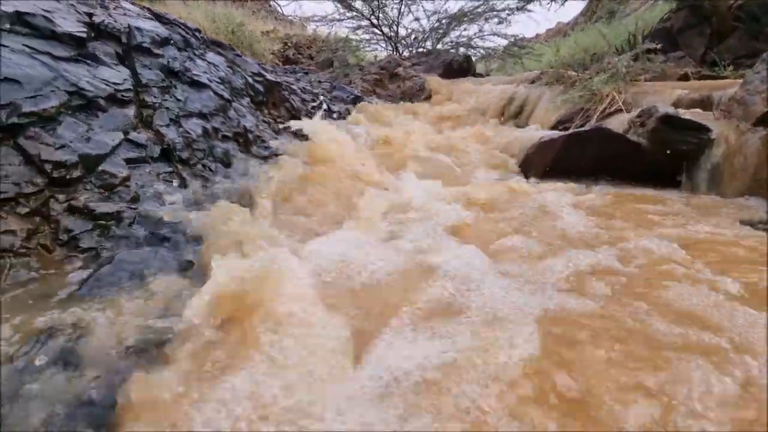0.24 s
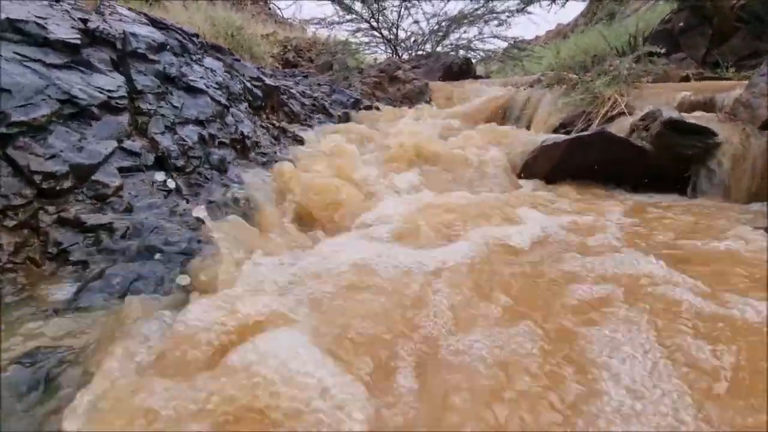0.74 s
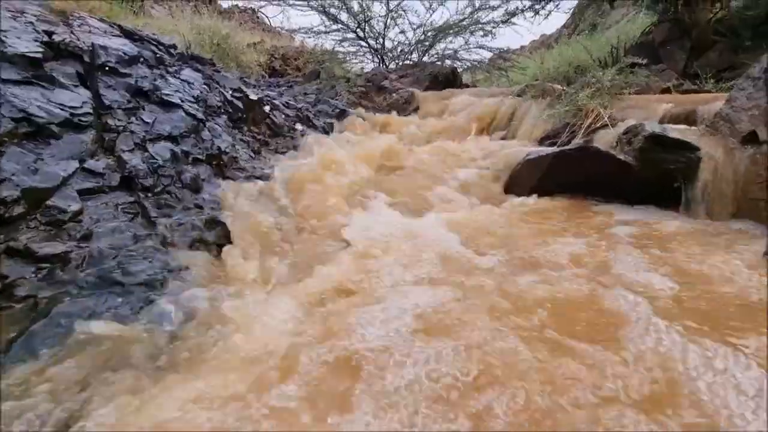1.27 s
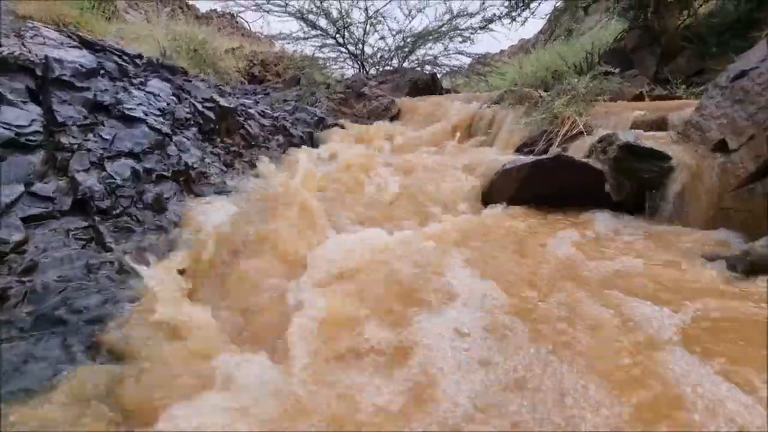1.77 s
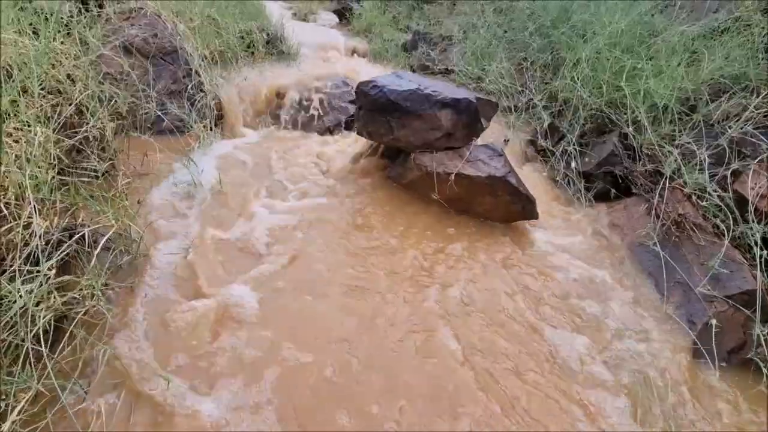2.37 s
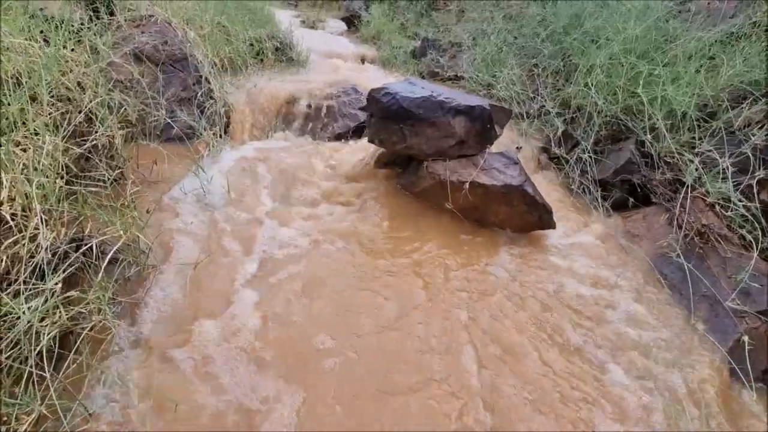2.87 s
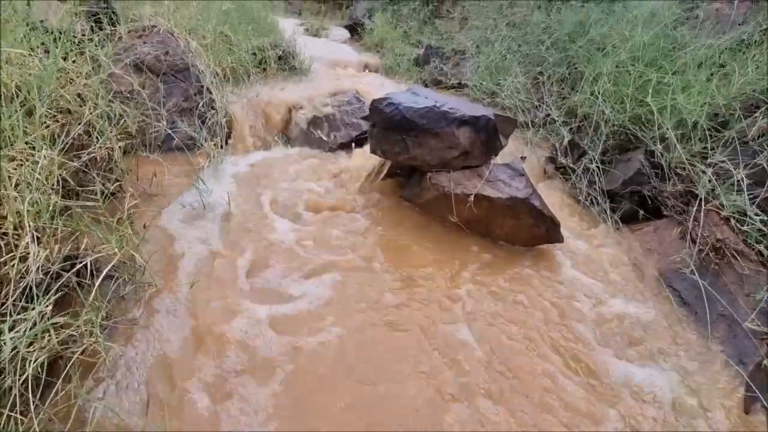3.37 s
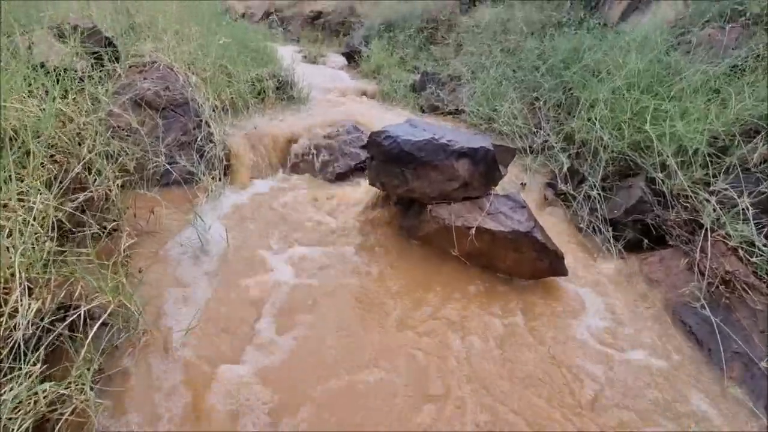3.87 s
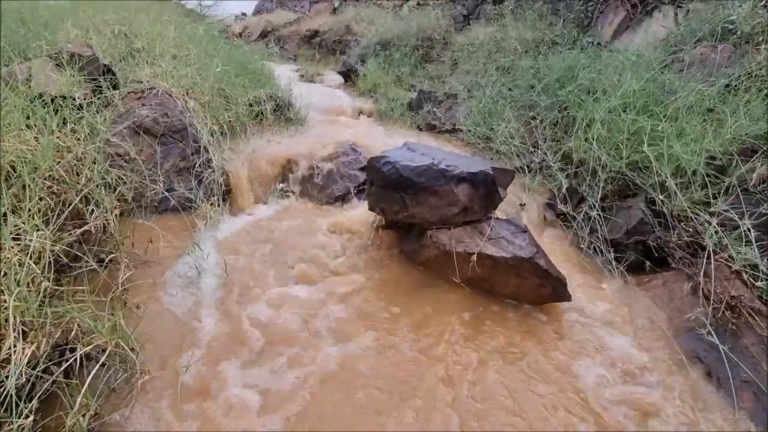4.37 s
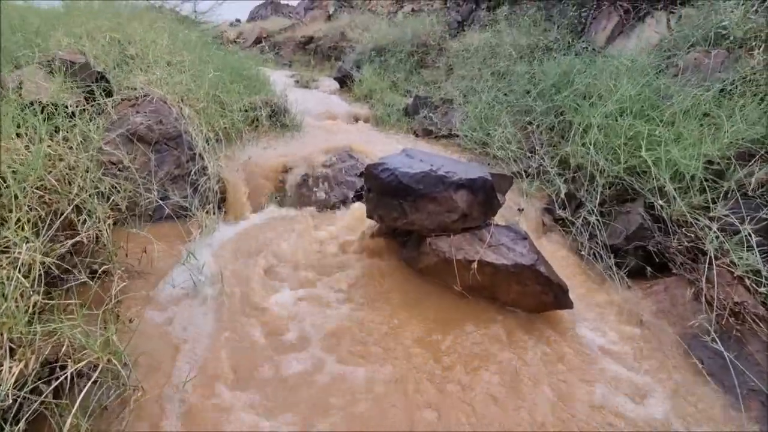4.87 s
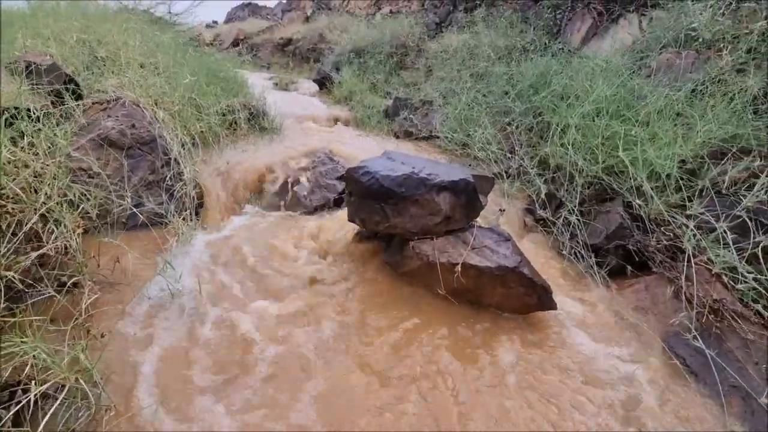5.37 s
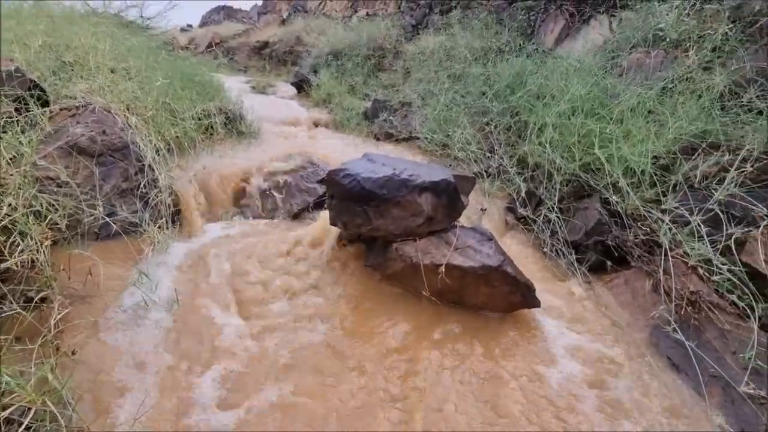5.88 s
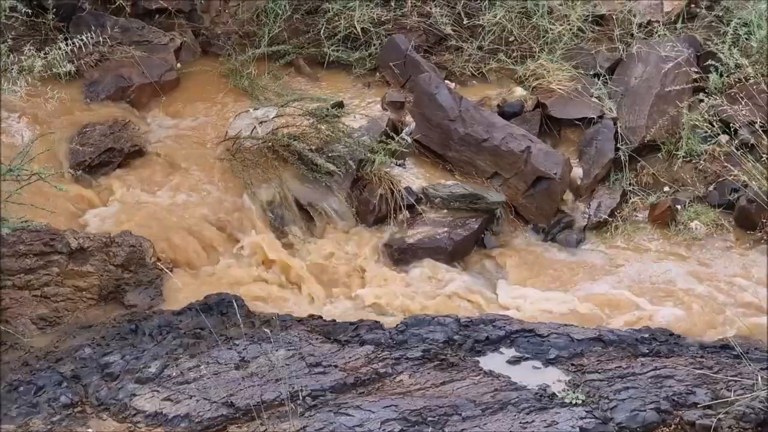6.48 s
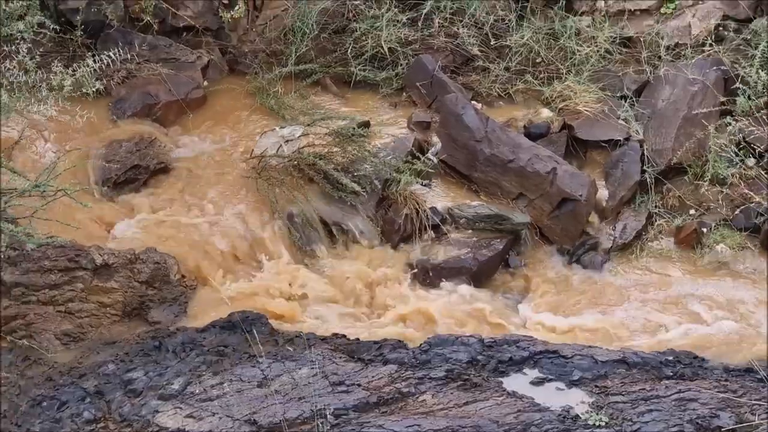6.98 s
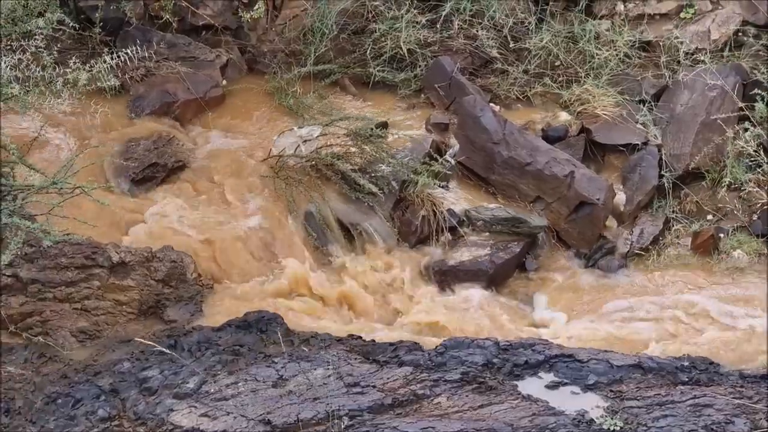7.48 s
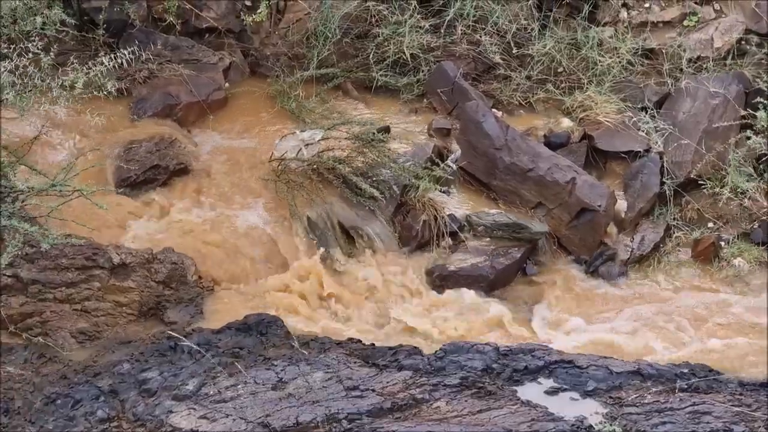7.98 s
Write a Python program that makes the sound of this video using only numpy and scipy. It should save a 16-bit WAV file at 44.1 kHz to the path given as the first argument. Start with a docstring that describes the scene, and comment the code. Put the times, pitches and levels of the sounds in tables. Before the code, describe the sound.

Outdoors, close to a muddy flood stream: churning water rushes down rocky rapids with bubbling gulps and sharp slaps. After a tiny, nearly silent cut, a pool roars on with deeper gulps, drips and splashes. Another cut leads to the bank, where wind rumbles and thumps on both microphones. The left side is muffled and hollow, the right bright and hissy.

```python
"""First muddy flood water pours down rocky rapids; a short, near-silent cut leads to a pool.
A second cut leads to the bank, where wind buffets both microphones; near the end the left one rings higher.
All along, the roar is noisy foam and clouds of ringing bubbles, with spray in random bursts.
Single gulps, drips and splashes stand out; the left microphone is muffled, the right one bright."""
import sys
import numpy as np
from scipy import signal
from scipy.fft import rfft, irfft, next_fast_len
from scipy.io import wavfile
from scipy.ndimage import uniform_filter1d, map_coordinates

SR = 44100
rng = np.random.default_rng(int(sys.argv[2]) if len(sys.argv) > 2 else 0)


def unload_audio(sound):
    """Save the sound as a 16-bit wav file, at the path given as the first command line argument."""
    columns = np.transpose(np.atleast_2d(sound))
    # keep every value between -1 and 1, then stretch to whole-number steps
    steps = np.round(np.clip(columns, -1, 1) * 32767)
    wavfile.write(sys.argv[1], SR, steps.astype(np.int16))


N = 362931  # length in samples


def amp(db):
    """Turn decibels into a gain."""
    return 10 ** (np.asarray(db) / 20)


def unit(x):
    """Scale a sound to an average (rms) strength of 1."""
    return x / np.sqrt(np.mean(x ** 2) + 1e-20)


def along(points, hz, axis=1):
    """Read one column of a table whose first column is f/Hz, on a log pitch axis."""
    columns = np.transpose(points)
    return np.interp(np.log(hz + 1), np.log(columns[0] + 1), columns[axis])


def wobble(rate):
    """Draw a smooth random curve with rate new random values a second."""
    knots = rng.standard_normal(int(N * rate / SR) + 4)
    return map_coordinates(knots, [np.arange(N) * rate / SR])


def filtered(x, response):
    """Multiply the spectrum of x by a response, which may also shift phases."""
    m = next_fast_len(N + SR // 4)
    return irfft(rfft(x, m) * response(np.fft.rfftfreq(m, 1 / SR)), m)[..., :N]


def add(track, s, sound):
    """Mix a sound into the track from time s."""
    part = track[max(0, round(s * SR)):][:len(sound)]
    part += sound[:len(part)]


def water():
    """Make two views of the flow, in front and aside, that share their ups and downs but not their noise."""
    roar_db, spray_db, _ = steady()
    swell_db = waves()
    # slow random sway, 7 values a second; spray takes 0.71 dB for each dB of a wave
    roar_db = roar_db + swell_db + 0.74 * wobble(7)
    spray_db = spray_db + 0.71 * swell_db + 0.35 * wobble(7)
    heave = unit(.75 * wobble(14) + wobble(58))
    bursts = unit(wobble(15) + .9 * wobble(50) + .7 * wobble(170))
    views = []
    for _ in range(2):
        roar, spray = torrent(heave, bursts)
        views.append(amp(roar_db) * roar + amp(spray_db) * spray)
    front, aside = views
    return front + gulps() + drips() + splashes(), aside


def torrent(heave, bursts):
    """Build the low roar from foam and gurgling bubbles, the high spray from foam, fizz and droplets."""
    foam = patchy_noise(patchy_db=1.4)
    deep_foam = filtered(foam, lambda hz: 1 / (1 + (hz / 1700) ** 4))
    bright_foam = foam - deep_foam
    gurgle = cloud(amp(2.2 * heave), 149.5, 1710.6, cycles=25.0, onset=0.045, spread_db=2.5, count=5000)
    fizz = cloud(amp(3 * bursts), 1602, 5960, cycles=29.5, onset=0.016, spread_db=3.0, count=12000)
    droplets = cloud(amp(5 * bursts), 5650, 16100, cycles=19, onset=.25, spread_db=3.5, count=18000)
    roar = amp(-4.0 + 0.97 * heave) * deep_foam + amp(-3.5) * gurgle
    spray = amp(-3.0 + 0.56 * bursts) * bright_foam + amp(-4.0) * fizz + amp(-5.0) * droplets
    return roar, spray


def patchy_noise(patchy_db):
    """Make churning foam: white noise with random patches of gain in time and pitch."""
    z = signal.stft(rng.standard_normal(N), nperseg=512)[2]
    field = uniform_filter1d(rng.standard_normal(z.shape), size=6, axis=0)  # smooth across pitch
    field = uniform_filter1d(field, size=8, axis=1)  # smooth across time
    noise = signal.istft(z * amp(patchy_db * unit(field)), nperseg=512)[1]
    return unit(noise[:N])


def cloud(activity, low_hz, high_hz, cycles, onset, spread_db, count):
    """Ring many bubbles, born more densely where activity is high, as strong per Hz as white noise of rms 1."""
    when, pitch, luck, ring = rng.random((count, 4)).T
    start = np.searchsorted(np.cumsum(activity) / activity.sum(), when)
    hz = low_hz * (high_hz / low_hz) ** pitch
    turns = cycles * 2 ** (2 * ring - 1)  # half to double the usual number of cycles
    life = turns / hz * SR  # in samples
    loudness_db = -spread_db * np.log(np.maximum(luck, .012))  # a few bubbles are much louder
    strength = hz / np.sqrt(turns) * amp(loudness_db) * rng.choice([-1, 1], count)
    # lay all bubbles end to end: who rings, and how many samples since its birth
    length = life.astype(int) + 1
    who = np.repeat(np.arange(count), length)
    step = np.arange(len(who)) - np.repeat(np.cumsum(length) - length, length)
    rings = strength[who] * bubble(step / life[who], turns[who], rise=0.074, onset=onset)
    mixed = np.bincount(start[who] + step, rings, N)[:N]
    return unit(mixed) * np.sqrt(abs(high_hz - low_hz) / (SR / 2))


def bubble(age, cycles, rise, onset):
    """Ring a fading bubble that rises in pitch as it nears the surface; age runs 0-1."""
    fade = (1 - np.exp(-age / onset)) * np.exp(-np.log(100) * age)
    return fade * np.sin(2 * np.pi * cycles * (age + rise * age ** 2 / 2))


# the three places, rapids, pool and bank: start t/s, end t/s
PLACE_TIMES = [(-.01, 2.089), (2.147, 6.327), (6.387, 8.24)]
# relative levels at each place: roar level/dB, spray level/dB, wind level/dB
STEADY_LEVELS = [(1.06, -0.04, -53), (-0.92, 0.08, -50.5), (0.23, 0.26, -30.5)]


def steady():
    """Look up the roar, spray and wind levels of the place heard at each moment."""
    ends = [end for start, end in PLACE_TIMES[:-1]]
    # switch 0.05 s late, inside the cut
    place = np.searchsorted(ends, np.arange(N) / SR - .05)
    return np.array(STEADY_LEVELS)[place].T


# waves that swell the flow: start t/s, time to the crest t/s, rise at the crest level/dB
WAVE_SWELLS = [(2.2, 0.094, 1.3), (4.1, .14, 2), (4.45, 0.26, 1), (5.15, .12, 1.3), (5.7, 0.34, 1.1),
               (8.08, .1, 2)]


def waves():
    """Swell the flow in dB: each wave rises quickly to its crest and drains more slowly."""
    swell_db = np.zeros(N)
    for s, crest_s, db in WAVE_SWELLS:
        age = np.maximum(np.arange(N) / SR - s, 0) / crest_s
        swell_db += db * age * np.exp(1 - age)
    return swell_db


# large air pockets that collapse: start t/s, starting pitch f/Hz, relative level/dB
GULP_EVENTS = [(.26, 1160, 11.5), (.333, 830, 6), (.512, 400, 9.5), (.535, 1030, 6), (.635, 896, 8.5),
               (.915, 1010, 7), (.925, 1357, 11), (.981, 1090, 4.5), (1.204, 720, 10), (1.35, 1080, 6),
               (1.382, 1030, 9), (1.611, 1130, 8), (2.269, 550, 12.5), (3.066, 706, 7), (3.668, 556, 6),
               (4.193, 1040, 7), (4.21, 634, 12), (4.234, 1470, 7), (4.385, 345, 4), (4.461, 425, 8),
               (4.787, 1130, 4), (4.964, 770, 9), (5.245, 360, 9.5), (5.882, 1095, 7.5), (5.943, 604, 9)]


def gulps():
    """Ring deep gulps as big single bubbles that rise in pitch."""
    return amp(-2.0) * plops(GULP_EVENTS, cycles_at_khz=17.8, rise=0.076, onset=0.11)


# water slapping on rock close by: t/s, brightest f/Hz, relative level/dB
SPLASH_EVENTS = [(0.108, 10500, 2), (0.239, 7140, 6.5), (0.433, 12200, 10), (0.616, 9600, 4),
                 (0.792, 8300, 3), (1.13, 10700, 5), (1.326, 14000, 7), (1.566, 12700, 4.7),
                 (2.58, 14100, 3), (2.82, 13100, 6), (2.969, 10900, 2), (4.218, 11200, 10),
                 (4.313, 4000, 3), (4.387, 11500, 9), (4.641, 12700, 9.5), (4.799, 12200, 8),
                 (5.398, 5700, 3.5), (5.889, 8800, 4), (5.981, 14600, 6), (6.214, 5230, 5),
                 (7.319, 8300, 5.5), (7.527, 7355, 5)]


def splashes():
    """Shape each slap from hiss: a short crack inside a puff of spray that swells and falls back."""
    out, t = np.zeros(N), np.arange(SR // 16) / SR
    hz = np.fft.rfftfreq(len(t), 1 / SR) + 1
    lead = .008  # s of puff before the listed time
    crack = np.exp(-np.abs(t - lead - .001) / 0.00094)
    puff = (t / 0.013) ** 2 * np.exp(2 - 2 * t / 0.012)
    for s, bright_hz, db in SPLASH_EVENTS:
        octaves_off = np.log2(hz / bright_hz)
        hiss = irfft(rfft(rng.standard_normal(len(t))) / (1 + (octaves_off / 0.87) ** 2), len(t))
        add(out, s - lead, unit(hiss) * (amp(db - 0.5) * crack + amp(db - 7) * puff))
    return out


# single drops that plink into the water: start t/s, starting pitch f/Hz, relative level/dB
DRIP_EVENTS = [(.611, 3040, 2), (.79, 8040, 3), (2.548, 6830, 3), (2.807, 3260, 2), (3.995, 2500, 3),
               (4.785, 5100, 5), (4.926, 6120, 5), (4.944, 1720, 2), (5.885, 4090, 5), (6.214, 5300, 2)]


def drips():
    """Ring each drop as one small bubble with many cycles."""
    return amp(-2.5) * plops(DRIP_EVENTS, cycles_at_khz=45, rise=0.037, onset=.08)


def plops(table, cycles_at_khz, rise, onset):
    """Ring single bubbles that stand out of the flow; higher ones ring for more cycles and get a boost."""
    out = np.zeros(N)
    for s, hz, db in table:
        pitch_gain = np.sqrt(hz / 1000)
        cycles = cycles_at_khz * pitch_gain
        age = np.arange(0, 1, hz / (cycles * SR))
        add(out, s, amp(db) * pitch_gain * bubble(age, cycles, rise, onset))
    return out


# colour of the water at each place and microphone: f/Hz, relative level/dB per Hz
RAPIDS_LEFT_COLOUR = [(50, -66), (160.0, -66), (254.0, -67.5), (346.0, -59.5), (471.0, -53), (641.0, -55.5),
                      (1020.0, -42), (1790.0, -68.5), (8810.0, -103.4), (14000.0, -103.6),
                      (15500.0, -112.3)]
RAPIDS_RIGHT_COLOUR = [(50, -63.5), (130, -69), (185, -61), (270, -67), (403, -55), (641, -59), (900, -55),
                       (1020, -50), (1320, -58.5), (3490, -68), (4520, -66), (5550, -74), (9760, -78),
                       (14000, -72), (15500, -78)]
POOL_LEFT_COLOUR = [(50, -64), (160.0, -71.5), (329.0, -62.5), (522.0, -53.5), (710.0, -59), (1070.0, -46),
                    (1890.0, -75), (3870.0, -82), (10800.0, -107.3), (12600.0, -96.5), (15500.0, -111.9)]
POOL_RIGHT_COLOUR = [(50, -65), (200, -69), (290, -62), (385, -52.5), (460, -58.5), (900, -57),
                     (1080, -52.8), (1500, -62.5), (2150, -67), (4070, -62.5), (5200, -73.5), (6750, -72),
                     (10700, -81), (12400, -67.5), (15500, -76.5)]
BANK_LEFT_COLOUR = [(50, -62), (330, -63.5), (460, -72.5), (580, -63.5), (800, -63.5), (1000, -53.5),
                    (1170, -57.5), (1380, -51), (1520, -63.5), (1700, -65.5), (1960, -74), (3620, -96),
                    (4140, -110), (5000, -114.5)]
BANK_RIGHT_COLOUR = [(50, -76), (330, -65), (460, -70.5), (590, -62), (720, -65.5), (975, -61),
                     (1990, -70.5), (3190, -68), (3740, -63), (6250, -77), (8910, -73.5), (11000, -80.5),
                     (12200, -71), (15500, -78.5)]
# how the microphones agree, facing upstream and across: f/Hz, likeness [0-1], left lead [radians]
UPSTREAM_AGREEMENT = [(49.6, 0.86, 1), (176, 1, 0), (443, 0.79, 0.68), (623, 0.13, -0.3),
                      (840, 0.58, -1.68), (1018, 0.92, -2), (1220, 0.68, -2), (1490, 0.2, -3),
                      (1850, 0.19, -3.5), (2900, 0.43, -3.5), (4000, .8, -5), (5500, .65, -4),
                      (14500, 0.7, -5.5)]
ACROSS_AGREEMENT = [(300, 1, -1.45), (600, 0.94, 0.5), (1080, 0.8, 0), (1370, 0.58, -1.3), (1610, 0.37, -3),
                    (2110, 0.37, -2), (3050, .43, -3.5), (3900, .48, -1), (4700, .22, -2.1), (7000, .03, 0)]


def listen(front, aside, left, right, agreement):
    """Give the right microphone the water in front, the left a phase-shifted share of it plus water aside."""
    def colour(points, hz):
        low_cut = hz / np.hypot(hz, 35)
        return amp(along(points, hz)) * np.sqrt(SR / 2) * low_cut  # the root turns level per Hz into gain

    def alike(hz):
        return np.clip(along(agreement, hz), 0, 1)

    def turn(hz):
        return np.exp(1j * along(agreement, hz, axis=2))

    shared = filtered(front, lambda hz: colour(left, hz) * alike(hz) * turn(hz))
    own = filtered(aside, lambda hz: colour(left, hz) * np.sqrt(1 - alike(hz) ** 2))
    return np.array([shared + own, filtered(front, lambda hz: colour(right, hz))])


# the grip shifts and the hollow at the left microphone rings higher: t/s, pitch factor [ratio]
HOLLOW_TUNING = [(8.03, 1.025), (8.15, 1.02), (8.22, 1.15)]


def retuned(sound, spectrum):
    """Slide the hollow's resonances by cross-fading between three tunings of the colour."""
    seconds, factors = np.transpose(HOLLOW_TUNING)
    factor = np.interp(np.arange(N) / SR, seconds, factors)
    steps = np.linspace(factor.min(), factor.max(), 3)
    out = np.zeros(N)
    for step, share in zip(steps, np.eye(len(steps))):
        shifted = filtered(sound, lambda hz: amp(along(spectrum, hz / step) - along(spectrum, hz)))
        out += np.interp(factor, steps, share) * shifted
    return out


# colour of the wind rumble: f/Hz, relative level/dB per Hz
RUMBLE_COLOUR = [(12, -27), (25, -14), (45, -2), (70, 4.5), (135, -7), (215, -8.5), (330, -14.5),
                 (440, -31), (800, -83)]
# single eddies that thump a microphone: middle t/s, level/dB, pitch f/Hz, share on the right [0-1]
THUMP_EVENTS = [(6.392, -11.5, 330, 0), (6.492, -12.5, 190, 1), (6.82, -12.5, 86, 0.2),
                (7.175, -13, 170, 0.3), (7.429, -11, 78.5, 0.75), (7.541, -6.5, 90, 0),
                (7.5695, -2.5, 200, 0), (7.6601, -9.5, 205, 0), (7.828, -8.5, 96, 0.8)]


def wind():
    """Make lumpy rumble, unrelated at the two microphones, and a few single thumps."""
    wind_db = wind_strength()

    def rumble():
        return unit(filtered(rng.standard_normal(N), lambda hz: amp(along(RUMBLE_COLOUR, hz))))

    # random lumps of 2.5 dB, 20 values a second
    ports = np.array([amp(db + 1.7 + 2.5 * wobble(20)) * rumble() for db in wind_db])
    # a light breeze stirs only large, slow eddies; stronger gusts add the higher ones
    slow = filtered(ports, lambda hz: 1 / (1 + (hz / 155) ** 4))
    gusty = np.clip((wind_db + 45) / 14, 0, 1)
    ports = slow + gusty * (ports - slow)
    for s, db, hz, right in THUMP_EVENTS:
        u = (np.pi * hz * (np.arange(N) / SR - s)) ** 2
        push = (1 - 2 * u) * np.exp(-u)  # a push between two sucks
        ports += np.outer([1 - right, right], amp(db) * push)
    return ports


# gusts on the microphones: middle t/s, length t/s, relative level/dB, share on the right [0-1]
GUST_EVENTS = [(.85, .3, -50, .3), (1.93, .25, -37, .55), (3.102, 0.28, -37, 0.52), (4.37, .09, -35, .15),
               (5.1, 0.19, -37.5, 0.13), (5.75, 0.44, -40.5, 0.25), (6.25, .15, -39, 0.15),
               (7.17, 0.13, -32, 0), (7.9, 0.2, -26.5, 0.98)]


def wind_strength():
    """Find the wind in dB at each microphone: the place's steady breeze plus bell-shaped gusts."""
    *_, breeze_db = steady()
    strength = np.tile(amp(breeze_db), (2, 1))
    for s, length, db, right in GUST_EVENTS:
        bell = np.exp(-(2 * (np.arange(N) / SR - s) / length) ** 2)
        strength += np.outer(np.clip([1 - right, right], 0, 1), amp(db) * bell)
    return 20 * np.log10(strength)


def scene():
    """Play the three places in turn, each cut in and out within a few milliseconds."""
    front, aside = water()
    air, t = wind(), np.arange(N) / SR
    rapids = amp(-0.02) * listen(front, aside, RAPIDS_LEFT_COLOUR, RAPIDS_RIGHT_COLOUR, UPSTREAM_AGREEMENT)
    pool = amp(0.12) * listen(front, aside, POOL_LEFT_COLOUR, POOL_RIGHT_COLOUR, UPSTREAM_AGREEMENT)
    bank = amp(-0.12) * listen(front, aside, BANK_LEFT_COLOUR, BANK_RIGHT_COLOUR, ACROSS_AGREEMENT)
    bank[0] = retuned(bank[0], BANK_LEFT_COLOUR)
    out = np.zeros((2, N))
    for (start, end), place in zip(PLACE_TIMES, (rapids, pool, bank)):
        inside = np.clip(np.minimum(t - start, end - t) / .004 + .5, 0, 1)
        # a faint trace dies away after each cut
        trail = (t > end) * amp(-20.0 - 60 * np.abs(t - end) / 0.048)
        out += (inside + trail) * (place + air)
    return out


def record(dry):
    """Keep nothing at or above the band limit of 15900 Hz."""
    return filtered(dry, lambda hz: hz < 15900)


dry = scene()
out = record(dry)
unload_audio(out)
```